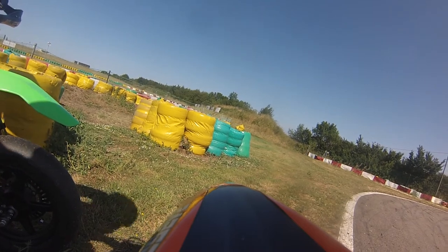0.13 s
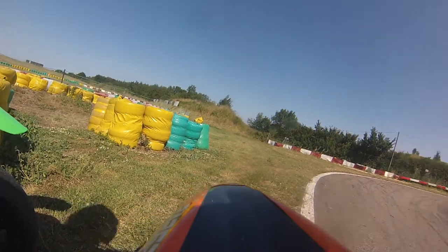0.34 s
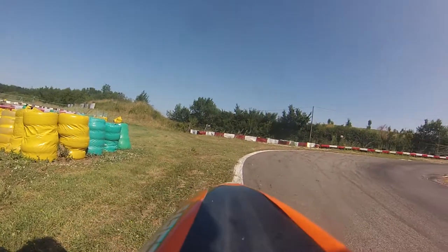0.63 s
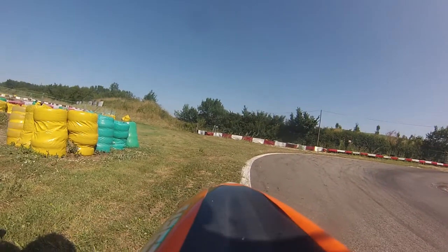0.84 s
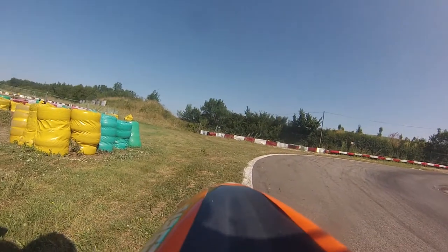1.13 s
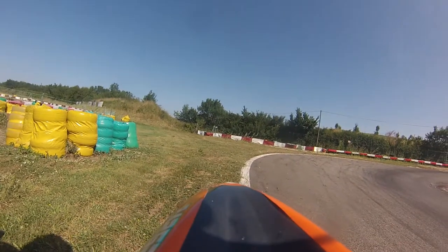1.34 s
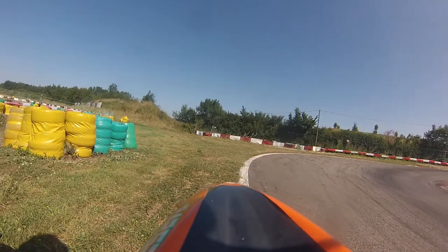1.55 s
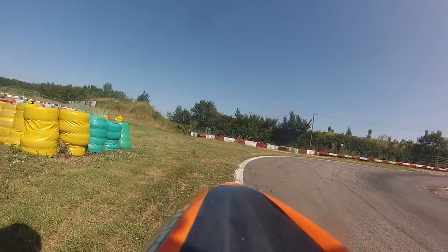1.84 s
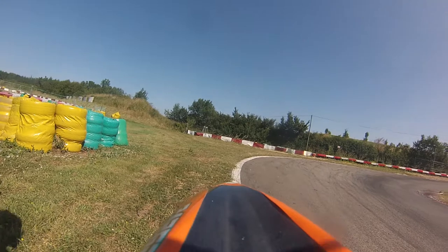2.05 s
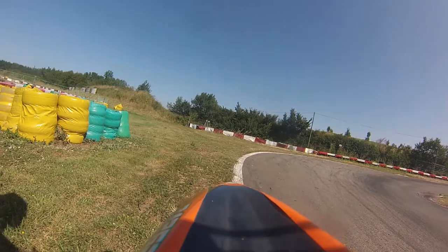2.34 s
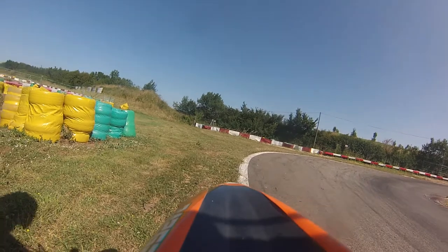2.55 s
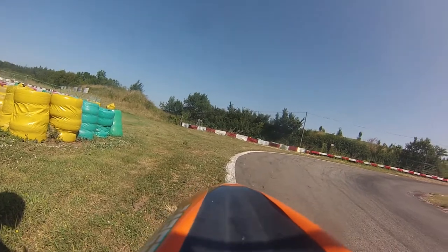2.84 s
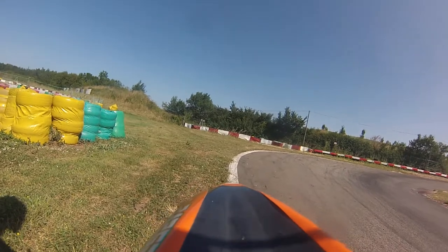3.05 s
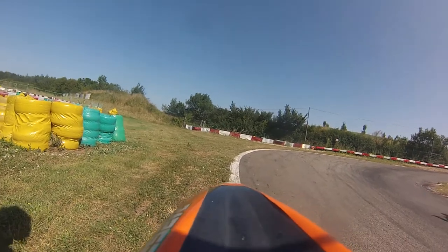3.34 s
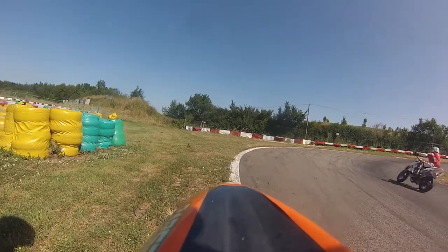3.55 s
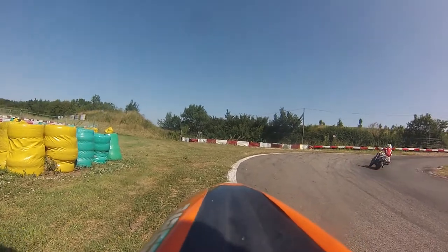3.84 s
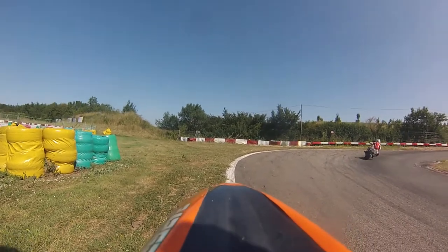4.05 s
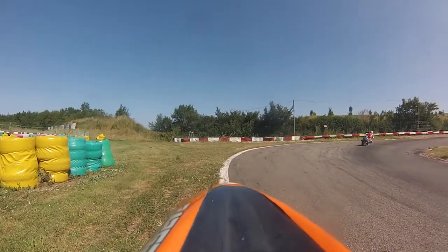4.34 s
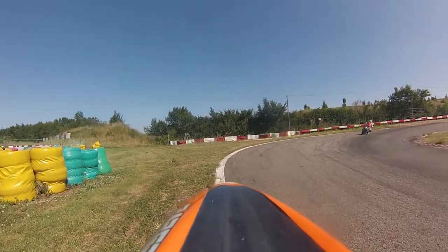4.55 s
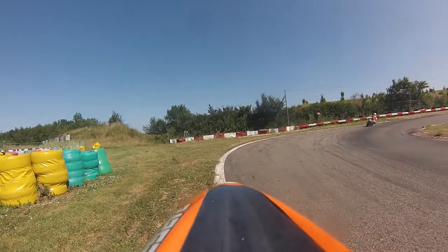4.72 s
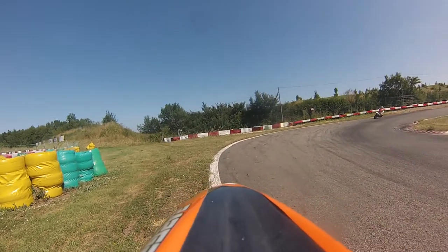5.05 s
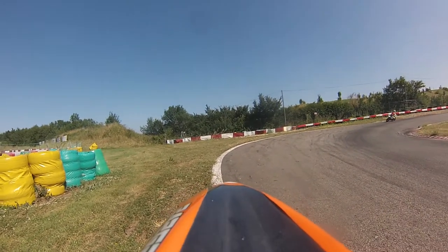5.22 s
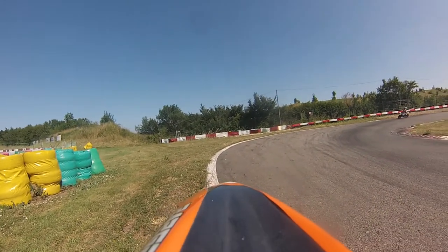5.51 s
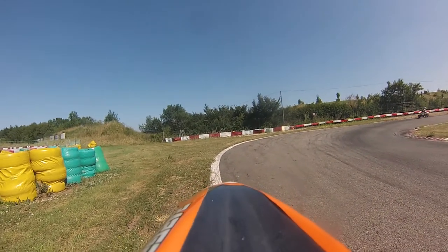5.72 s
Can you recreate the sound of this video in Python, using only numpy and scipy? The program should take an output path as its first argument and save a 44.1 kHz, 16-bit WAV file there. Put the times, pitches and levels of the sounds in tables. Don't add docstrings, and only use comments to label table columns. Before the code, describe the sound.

A neighbouring motorbike idles quietly amid faint knocks and squeaks, then a kick-start fires the rider's small engine, which is revved twice and clunked into gear.

```python
import sys
import numpy as np
from scipy import signal
from scipy.fft import rfft, irfft
from scipy.io import wavfile
from scipy.ndimage import uniform_filter1d, map_coordinates

SR = 44100
rng = np.random.default_rng(int(sys.argv[2]) if len(sys.argv) > 2 else 0)


def master(y):
    cut = np.clip(np.atleast_2d(y).T, -1, 1)
    pcm = np.round(cut * 32767)
    wavfile.write(sys.argv[1], SR, pcm.astype(np.int16))


def natural_amplitude(level_db):
    exponent = np.asarray(level_db, float) / 20
    return 10 ** exponent


N = 259308

# time in seconds, crank speed in turns per s, level in dB.
OTHER_BIKE_SPEED = [
    (0.0, 53, -46),
    (0.33, 40, -48.5),
    (0.55, 37.3, -50.5),
    (0.79, 31, -55),
    (1.1, 27.4, -56.5),
    (1.85, 27.4, -57.5),
    (2.09, 30.3, -57),
    (2.77, 32, -57),
]
# frequency in Hz, density in dB per Hz.
EXHAUST_SPECTRUM = [(45, -43.5), (75, -24), (118, 1.5), (160, -8), (205, -10), (250, -17.5), (300, -17.5),
                    (360, -31.5), (450, -27), (700, -64)]
CLATTER_SPECTRUM = [(200, -51), (340, -17), (472, -8.5), (540, -11.5), (825, -12.5), (953, -17),
                    (1070, -14), (1560, 2), (1980, -14), (2250, 0.5), (2940, -19), (3240, -17.5),
                    (3400, -29.5), (4420, -42), (7480, -120)]
VALVE_SPECTRUM = [(3000, -21.5), (3500, -3.5), (4300, 1.5), (5200, -1.5), (6200, -6.5), (6900, -6),
                  (7200, -19), (7600, -1), (8800, -13.5), (9850, -9), (10500, -10.5), (11500, -13.5),
                  (15000, -26.5), (17000, -53)]
# frequency in Hz, width in Hz, level in dB.
TAPPET_MODES = [(5150, 260, -2), (6980, 160, 3), (7600, 170, -3.5), (10350, 270, -5)]
CASING_MODES = [(2907, 90, 1), (3050, 50, 1), (3405, 49, 1.5), (4330, 60, -6.5), (5700, 80, -5.5),
                (8000, 160, -8), (10550, 130, -13), (11050, 110, -15.5)]

# time in seconds, peak in dB, fall in dB per s.
LURCHES = [
    (0.22, -39.5, 39),
    (0.64, -53, 27.5),
    (1.37, -54, 300),
    (1.55, -51, 106),
    (1.94, -41.5, 30),
    (2.62, -63, 4.5),
    (2.86, -16.5, 179.5),
    (2.961, -11, 392),
]
# frequency in Hz, width in Hz, level in dB.
SUSPENSION_MODES = [(24.5, 17, 1.5), (52.8, 64, -3)]

# start in seconds, length in s, first Hz, last Hz, peak in dB.
SQUEAK_GLIDES = [
    (1.376, 0.085, 8550, 8420, -64.5),
    (2.052, 0.14, 855, 800, -62),
    (2.269, 0.12, 1570, 1930, -61),
]

# time in seconds, peak in dB, thud in dB, housing share in dB, length in s.
KNOCK_EVENTS = [(1.426, -39.5, -39, -6, 0.015), (1.514, -45, -58, -7, 0.01),
                (1.527, -35.5, -46.5, -4, 0.013), (1.917, -37.5, -24.5, -0.5, 0.025),
                (1.987, -40.5, -49, -6.5, 0.012), (2.05, -45, -62, -3, 0.012),
                (2.15, -62, -38.5, 1, 0.0081), (2.367, -34.5, -49, -4.5, 0.011),
                (2.414, -54, -54, -6, 0.009), (2.448, -38.5, -60, -6, 0.011), (2.495, -37, -55, 0, 0.014),
                (2.799, -31.5, -33, 0, 0.01), (2.827, -34, -26, -26, 0.015),
                (2.834, -10, -17.5, -17, 0.015), (2.871, -14.5, -16.5, -5, 0.028),
                (2.94, -12.5, -24, -6, 0.02)]
# frequency in Hz, level in dB, decay by 60 dB in s.
THUD_MODES = [(205.6, -7, 0.27), (220.4, -2, 0.083), (434, -6, 0.031)]
# frequency in Hz, width in Hz, level in dB.
SHELL_MODES = [(548, 130, -3), (800, 126, -3), (1216, 100, -12), (2090, 320, -3), (2346, 80, 7)]
# time in seconds, level in dB, width in s, signed direction.
CLUNK_EVENTS = [
    (2.98, -4.5, 0.0055, -1.2),
    (5.2437, -5, 0.0051, 1),
    (5.2478, 4.5, 0.003, 1),
]
# time in seconds, peak in dB.
JOLT_EVENTS = [(3.025, -9), (3.0445, -7), (3.257, -20), (3.929, -19.5), (4.027, -4.5), (4.2672, -10),
               (4.298, -11.5), (4.9657, -21), (5.5986, -12.5), (5.62, -16.5), (5.663, -6.5)]

# time in seconds, speed in turns per s.
CRANK_SPEED = [(2.9, 48.5), (3.0, 62.5), (3.16, 77.3), (3.28, 60.4), (3.42, 160.4), (3.68, 124), (3.94, 96),
               (4.12, 82.2), (4.375, 60), (4.43, 91), (4.51, 142.7), (4.66, 124), (4.93, 95.4), (5.12, 77),
               (5.33, 62.9), (5.51, 53.6), (5.67, 59.8), (5.88, 55)]
# speed in turns per s, then first, second, third and half orders in dB.
MOUNT_ORDERS = [(51.2, -11.5, -49, -39, -39), (58.5, -15.5, -25, -41.5, -39), (74.9, -18, -23.5, -29, -29),
                (81.7, -21.5, -35.5, -39, -49), (88, -23, -20, -45, -44.5), (97.6, -29, -12, -47.5, -44),
                (116, -26.5, -17.5, -47, -29.5), (142, -19.5, -16, -31.5, -21.5),
                (151.6, -22, -22, -51, -32)]
THROTTLE_LIFT_DB = [1.5, 3.0, 8.0, 14.0]
# frequency in Hz, density in dB per Hz.
FRAME_SPECTRUM = [(12, -41.5), (20, -12), (43, -21), (69, -5.5), (87, -18.5), (108, -12), (209, -4.5),
                  (340, -38), (440, -79.5), (750, -120)]

# time in seconds, level in dB.
KICK_SHAKE = [
    (2.795, -60),
    (2.801, -27),
    (2.82, -34),
    (2.83, -27.5),
    (2.84, -11.5),
    (2.852, -23.5),
    (2.945, -28.5),
]
ENGINE_SHAKE = [(2.94, -18.5), (3.1, -24), (3.12, -18.5), (3.33, -18), (3.55, -16), (3.82, -18),
                (3.88, -22), (4.11, -21.5), (4.2, -20), (4.25, -22), (4.38, -23), (4.4, -18), (4.96, -19.5),
                (5.12, -17), (5.24, -17.5), (5.28, -25), (5.7, -22.5), (5.88, -24.5)]
# level in dB at -20 dB shake and 80 turns per s,
# share of the shake's swing, dB per 100 turns per s, dB added by chatter.
HOUSING_LAYERS = [(-21, 1.17, 2.8, 0.7), (-29.5, 1.036, 3.5, 4.5), (-46, 1.04, 8.5, 4),
                  (-64.5, 0.94, 11, -3.5)]
# frequency in Hz, width in Hz, level in dB.
CAVITY_MODES = [(2102, 82, -7), (2333, 130, -4.5), (2372.5, 64.7, 2), (2441, 51, 1)]
# frequency in Hz, density in dB per Hz.
BODY_SPECTRUM = [(180, -22), (300, -8), (357, -14), (412, -12), (479, -2.5), (648, -12), (816, -4),
                 (964, -11), (1060, -8), (1140, -13), (1400, -5.5), (1590, -14.5), (1850, -10.5),
                 (2000, -9), (2600, -9), (4400, -120)]
HISS_SPECTRUM = [(2500, -17), (2750, -14), (2980, 2.5), (3200, -14), (3500, -10), (3830, -3.5),
                 (4300, -12.5), (5200, -17.5), (6500, -22), (9000, -65)]
AIR_SPECTRUM = [(4500, -23), (5700, 0), (7200, -6), (8900, -17), (10100, -12), (12000, -21.5),
                (15000, -28.5), (17000, -49)]

# start in seconds, peak in seconds, end in seconds, peak in dB.
CHATTER_SPELLS = [
    (3.295, 3.32, 3.38, -49),
    (4.075, 4.197, 4.245, -45.5),
    (4.408, 4.435, 4.46, -48.5),
]
# time in seconds, peak in dB.
LONE_HITS = [
    (2.8335, -36),
    (2.9372, -40),
    (2.98, -57),
    (3.3233, -30),
    (4.0117, -37),
    (4.0337, -54),
    (4.0578, -47),
    (5.255, -39),
]
# frequency in Hz, width in Hz, level in dB.
LOOSE_PART_MODES = [(5900, 500, -5.5), (7010, 1300, -2), (10080, 680, -5)]
# frequency in Hz, density in dB per Hz.
REBOUND_SPECTRUM = [(300, -36), (900, -1), (2000, 12.5), (4000, -12.5), (6000, -14.5), (7100, -17),
                    (8200, -27), (12000, -59.5)]


def rms_one(x):
    return x / np.sqrt(np.mean(x ** 2) + 1e-20)


def in_time(rows, silent=False):
    s, *columns = np.transpose(rows)
    edge_db = -150. if silent else None
    return [np.interp(np.arange(N) / SR, s, c, edge_db, edge_db) for c in columns]


def colour(x, points):
    size = 8192
    hz, db = np.transpose(points)
    grid_hz = np.maximum(np.arange(size // 2 + 1) * SR / size, 1)
    spectrum_db = np.interp(np.log(grid_hz), np.log(hz), np.maximum(db, -70))
    cepstrum = irfft(np.log(natural_amplitude(spectrum_db)))
    cepstrum[1:size // 2] *= 2
    cepstrum[size // 2 + 1:] = 0
    impulse = irfft(np.exp(rfft(cepstrum)))
    return signal.fftconvolve(x, impulse)[:len(x)]


def resonate(x, peaks):
    out = 0
    for hz, width_hz, db in peaks:
        r = np.exp(-np.pi * width_hz / SR)
        b = [(1 - r * r) / 2, 0, (r * r - 1) / 2]
        a = [1, -2 * r * np.cos(2 * np.pi * hz / SR), r * r]
        out = out + natural_amplitude(db) * signal.lfilter(b, a, signal.lfilter(b, a, x))
    return out


def even(x, seconds=0.073):
    width = int(seconds * SR)
    power = uniform_filter1d(uniform_filter1d(x ** 2, width), width)
    return x / np.sqrt(power + 1e-18)


def drift(rate_hz):
    knots = rng.standard_normal(2000)
    return map_coordinates(knots, [np.arange(N) * rate_hz * 2 / SR], order=3, mode="wrap")


def decaying_noise(hits, decay_s):
    return signal.lfilter([1], [1, -np.exp(-1 / (decay_s * SR))], hits) * rng.standard_normal(N)


def pulses(turns, spread_db):
    whole = np.floor(turns).astype(int)
    strength = natural_amplitude(spread_db * rng.standard_normal(1000)[whole % 1000])
    return np.diff(whole, prepend=whole[0]) * strength


def bursts(turns, beat_db, firing_db, uneven_db):
    swell_db = beat_db * np.cos(2 * np.pi * turns) + firing_db * np.cos(np.pi * turns)
    swell_db = swell_db + uneven_db * drift(60)
    return natural_amplitude(swell_db) * rng.standard_normal(N)


def strikes(events):
    train = np.full(N, 1e-18)
    for s, db in events:
        train[round(s * SR)] = natural_amplitude(db)
    return train


def other_bike():
    speed, clatter_db = in_time(OTHER_BIKE_SPEED)
    above_db = clatter_db + 57
    exhaust_db = -54.5 + 0.6 * above_db
    valve_db = -67 + 1.13 * above_db
    casing_db = -77.5 + 2.16 * above_db
    turns = np.cumsum(speed) / SR + 0.28

    weak = np.clip(0.029 * speed, 0, 1)
    beats = pulses(turns / 2, spread_db=1.2) + weak * pulses(turns / 2 + 0.5, spread_db=1.6)
    exhaust = colour(rms_one(beats) + 0.45 * rng.standard_normal(N), EXHAUST_SPECTRUM)
    clatter = colour(bursts(turns, beat_db=1.5, firing_db=-1.0, uneven_db=0.5), CLATTER_SPECTRUM)

    rustle = colour(bursts(turns + 0.56, beat_db=2.8, firing_db=-0.5, uneven_db=0.8), VALVE_SPECTRUM)
    pair = pulses(turns + 0.47, spread_db=3.5) + pulses(turns + 0.07, spread_db=3.0)
    valves = even(rustle) + natural_amplitude(-8) * even(resonate(pair + 1e-18, TAPPET_MODES))

    casing = resonate(bursts(turns, beat_db=2.0, firing_db=-0.3, uneven_db=-1.0), CASING_MODES)
    out = natural_amplitude(casing_db) * even(casing) + natural_amplitude(exhaust_db + 1.5) * even(exhaust)
    return out + natural_amplitude(clatter_db + 1.0) * even(clatter) + natural_amplitude(valve_db - 1.5) * valves


def sway():
    t = np.arange(N) / SR
    rise_db_per_s, still_db = 396, -70.5
    level = natural_amplitude(still_db)
    for s, db, fall_db_per_s in LURCHES:
        level = level + natural_amplitude(db - np.maximum(rise_db_per_s * (s - t), fall_db_per_s * (t - s)))
    return level * even(resonate(rng.standard_normal(N), SUSPENSION_MODES), seconds=0.18)


def squeaks():
    out = 0
    glide_share = 0.55
    for s, length_s, first_hz, last_hz, db in SQUEAK_GLIDES:
        share = np.clip((np.arange(N) / SR - s) / length_s, 0, 1)
        hz = first_hz + (last_hz - first_hz) * np.clip(share / glide_share, 0, 1)
        level = np.sin(np.pi * share) * natural_amplitude(db + 2.5 * drift(72))
        phase = 2 * np.pi * np.cumsum(hz * (1 + 0.004 * drift(70))) / SR
        out = out + np.sqrt(2) * level * np.sin(phase)
    return out


def knocks():
    out = np.zeros(N)
    t = np.arange(int(0.2 * SR)) / SR
    for s, peak_db, thud_db, body_db, length_s in KNOCK_EVENTS:
        scrape = rng.standard_normal(len(t)) * np.exp(-(t / np.clip(length_s, 1e-3, 0.04)) ** 2)
        ring = resonate(scrape, SHELL_MODES[3:])
        body = resonate(scrape, SHELL_MODES[:3])
        crack = ring / np.abs(ring).max() + natural_amplitude(body_db) * body / np.abs(body).max()
        hiss = rms_one(colour(scrape, HISS_SPECTRUM))
        thud = sum(natural_amplitude(db - 60 * t / t60) * np.sin(2 * np.pi * hz * t) for hz, db, t60 in THUD_MODES)
        thud = thud * (1 - np.exp(-t / 0.0061))
        knock = natural_amplitude(peak_db - 4.0) * crack + natural_amplitude(1.47 * peak_db - 36.5) * hiss + natural_amplitude(thud_db + 2) * thud
        at = round(s * SR)
        out[at:at + len(t)] += knock
    return out


def clunks():
    out = np.zeros(N)
    for s, db, width_s, direction in CLUNK_EVENTS:
        near_s = np.arange(N) / SR - s
        snap = colour(rng.standard_normal(N) * np.exp(-(near_s / 0.0012) ** 2), AIR_SPECTRUM)
        push = direction * np.exp(-(near_s / (width_s / 3)) ** 2)
        out += natural_amplitude(db) * (push + natural_amplitude(-25) * snap)
    return out


def jolts():
    return natural_amplitude(22.0) * resonate(decaying_noise(strikes(JOLT_EVENTS), 0.0024), CAVITY_MODES)


def mount_orders(speed, turns, throttle, loose):
    at, *passed = np.transpose(MOUNT_ORDERS)
    first_db, second_db, third_db, half_db = (
        np.interp(speed, at, db) + lift_db * throttle + 1.5 * drift(8.6)
        for db, lift_db in zip(passed, THROTTLE_LIFT_DB))
    second_db = second_db + 3.5 * loose
    third_db = third_db + 13 * loose
    phase = 2 * np.pi * turns + 0.065 * drift(25)
    orders = natural_amplitude(first_db) * np.sin(phase) + natural_amplitude(second_db) * np.sin(2 * phase)
    orders = orders + natural_amplitude(third_db) * np.sin(3 * phase)
    halves = np.sin(1.5 * phase) + natural_amplitude(-31.0) * np.sin(phase / 2) + natural_amplitude(-16.5) * np.sin(2.5 * phase)
    return np.sqrt(2) * (orders + natural_amplitude(half_db - 5.0) * halves)


def frame_drum(fast, turns, throttle, geared):
    drum_db = -29.5 - 10.5 * fast + 8 * uniform_filter1d(throttle, SR // 12) - 4.5 * geared
    drum = colour(bursts(turns, beat_db=6.0, firing_db=7.5, uneven_db=2.5), FRAME_SPECTRUM)
    return natural_amplitude(drum_db) * even(drum)


def housing_rattle(speed, fast, turns, throttle, loose):
    t = np.arange(N) / SR
    kick_db = in_time(KICK_SHAKE, silent=True)[0]
    engine_db = in_time(ENGINE_SHAKE, silent=True)[0]
    shake_db = uniform_filter1d(np.maximum(kick_db, engine_db), SR // 400)
    ring_db, body_db, hiss_db, air_db = (
        db + share * (shake_db + 20) + speed_db * fast + loose_db * loose
        for db, share, speed_db, loose_db in HOUSING_LAYERS)

    rattle = bursts(turns + 0.69, beat_db=1.0, firing_db=1.5, uneven_db=-1.0)
    lull_s, lull_depth = 0.007, 0.7
    slack = sum(np.exp(-((t - s + lull_s) / lull_s) ** 2) * (t < s) for s, _ in JOLT_EVENTS)
    ring = (1 - lull_depth * slack) * even(resonate(rattle, CAVITY_MODES))

    blows = rms_one(pulses(turns, spread_db=1.6)) * natural_amplitude(3 * drift(7))
    blow_share = 0.8 * (speed / 135) ** 2.5 * (1 - throttle)
    body = even(colour(rms_one(rattle) + blow_share * blows, BODY_SPECTRUM))

    grit = bursts(turns + 0.79, beat_db=3.0, firing_db=-1.0, uneven_db=2.0)
    hiss = even(colour(grit, HISS_SPECTRUM))
    air = even(signal.lfilter(*signal.butter(2, 16600, fs=SR), colour(grit, AIR_SPECTRUM)))
    out = natural_amplitude(ring_db) * ring + natural_amplitude(body_db) * body
    return out + natural_amplitude(hiss_db - 0.5) * hiss + natural_amplitude(air_db + 3.5) * air + specks(natural_amplitude(air_db + 65))


def specks(level):
    per_s = 14
    born = (rng.random(N) < per_s / SR) * natural_amplitude(4 * rng.standard_normal(N))
    band = signal.butter(2, [7000, 13000], "band", fs=SR, output="sos")
    return natural_amplitude(-39) * level * signal.sosfilt(band, born + 1e-18)


def loose_part(turns, chatter):
    hits = natural_amplitude(39.5) * chatter * pulses(turns + 0.48, spread_db=1.5)
    hits = hits + natural_amplitude(22.5) * strikes(LONE_HITS)
    rebounds = natural_amplitude(46) * chatter * pulses(turns + 0.13, spread_db=1.5)
    rasp = natural_amplitude(-17) * decaying_noise(hits, 0.0025)
    out = resonate(hits + rasp, LOOSE_PART_MODES)
    out = out + natural_amplitude(-12.5) * resonate(rebounds, LOOSE_PART_MODES[1:2])
    return out + colour(rebounds + natural_amplitude(5.5) * rasp, REBOUND_SPECTRUM)


def spell(start_s, peak_s, end_s, db):
    t = np.arange(N) / SR
    away = np.maximum((peak_s - t) / (peak_s - start_s), (t - peak_s) / (end_s - peak_s))
    return natural_amplitude(db - 17 * np.minimum(away, 3) ** 2) * np.clip(20 * (1.05 - away), 0, 1)


def own_engine():
    t = np.arange(N) / SR
    speed, = in_time(CRANK_SPEED)
    turns = np.cumsum(speed) / SR
    fast = (speed - 80) / 100
    gain = uniform_filter1d(np.gradient(speed) * SR, SR // 40)
    throttle = np.clip(gain / 1380, 0, 1)

    catch_s, catch_db_per_s = 3.0, 134
    running = np.clip((t - CRANK_SPEED[0][0]) / 0.025, 0, 1)
    running = running * natural_amplitude(-catch_db_per_s * np.clip(catch_s - t, 0, None))
    gear_s, dip_db, recovery_s = 5.25, -6, 0.06
    running = running * natural_amplitude(dip_db * (t > gear_s) * np.exp(-np.abs(t - gear_s) / recovery_s))
    geared = np.clip((t - gear_s) / 0.03, 0, 1)

    chatter = sum(spell(*row) for row in CHATTER_SPELLS)
    loose = np.clip(chatter * natural_amplitude(46), 0, 1)
    shaking = mount_orders(speed, turns, throttle, loose) + frame_drum(fast, turns, throttle, geared)
    rattle = housing_rattle(speed, fast, turns, throttle, loose)
    touch = natural_amplitude(-70) * running
    return running * shaking + rattle + loose_part(turns, chatter + touch)


def scene():
    return (other_bike() + sway() + squeaks() + knocks() + clunks() + jolts() + own_engine())[None]


def low_pass(x):
    return signal.sosfilt(signal.butter(12, 15760, fs=SR, output="sos"), x)


def record(dry):
    mix = np.clip(dry, -1, 1)
    return low_pass(mix)


dry = scene()
out = record(dry)
master(out)
```